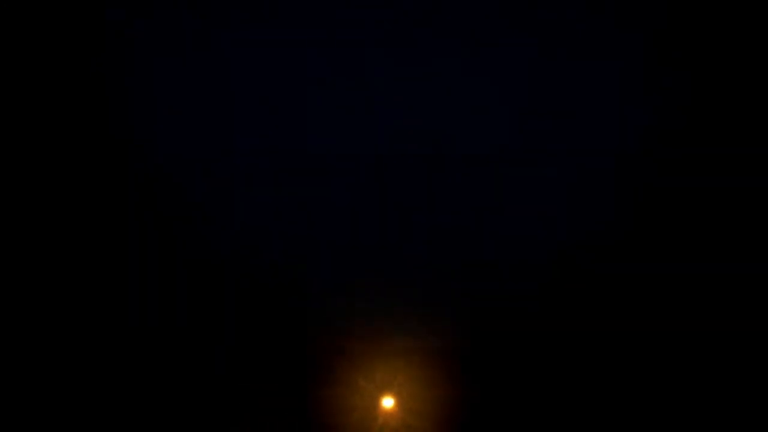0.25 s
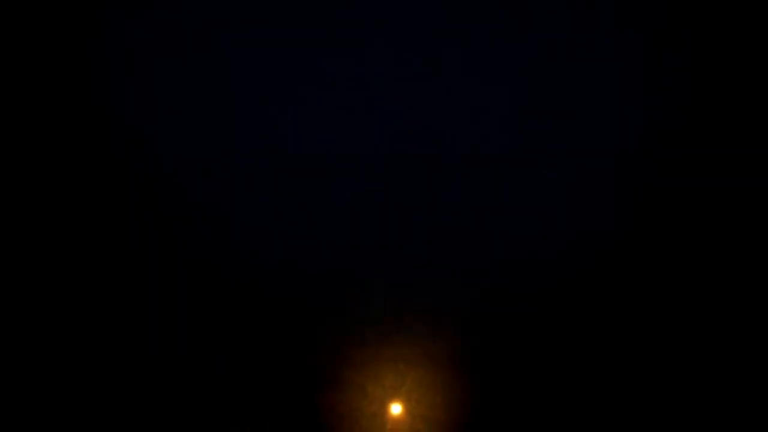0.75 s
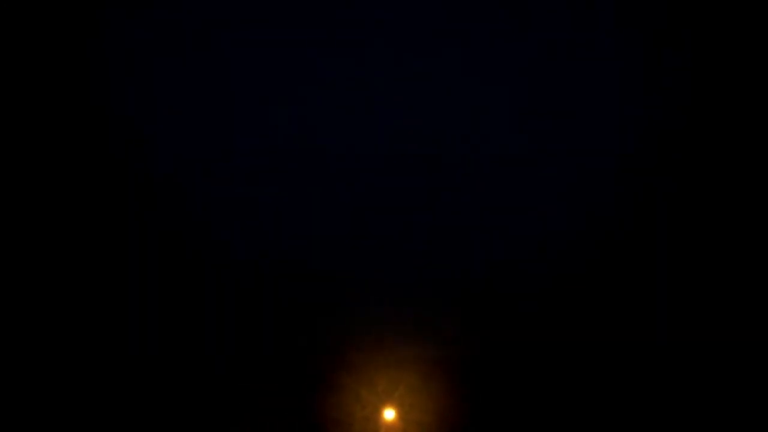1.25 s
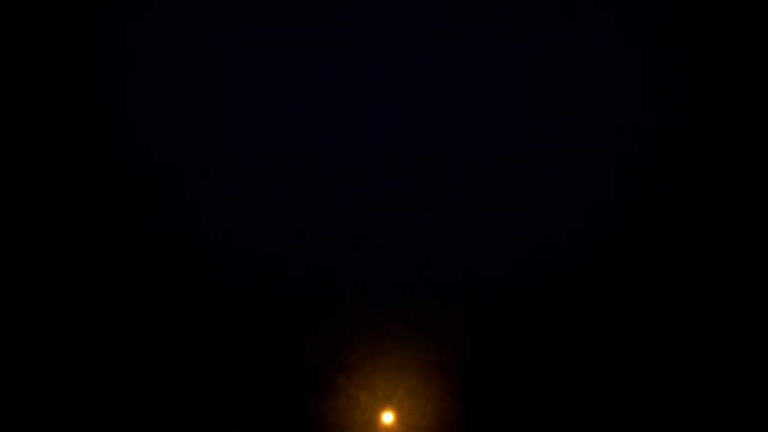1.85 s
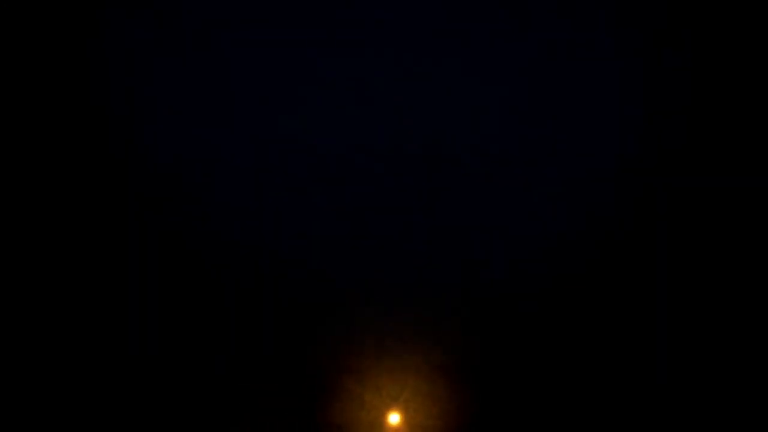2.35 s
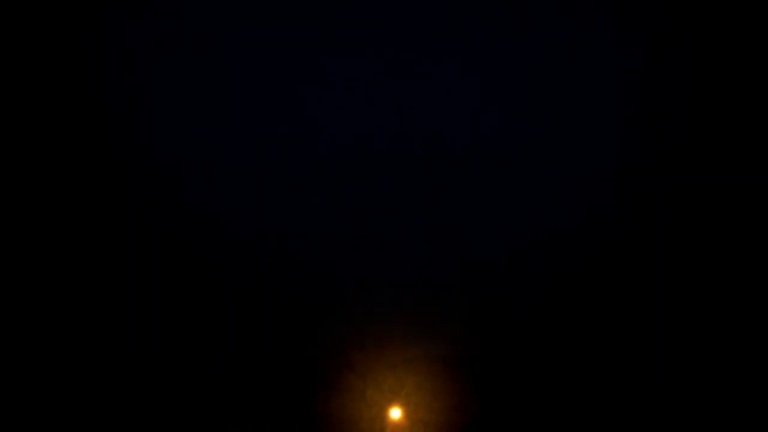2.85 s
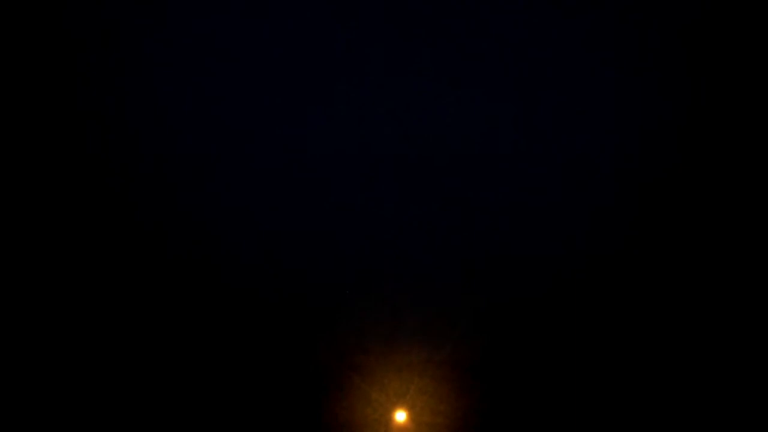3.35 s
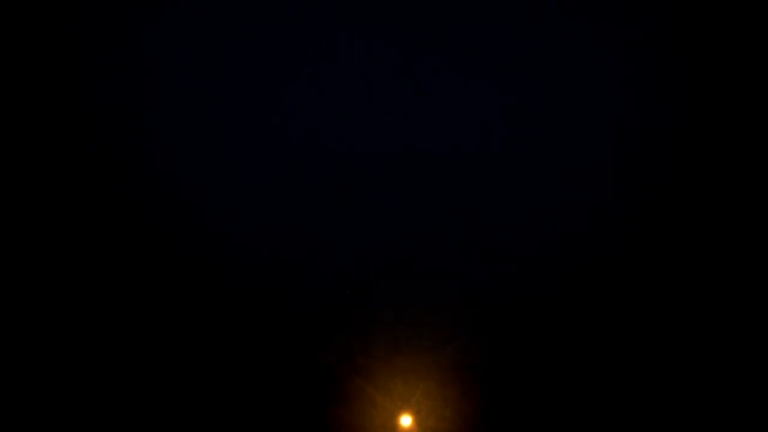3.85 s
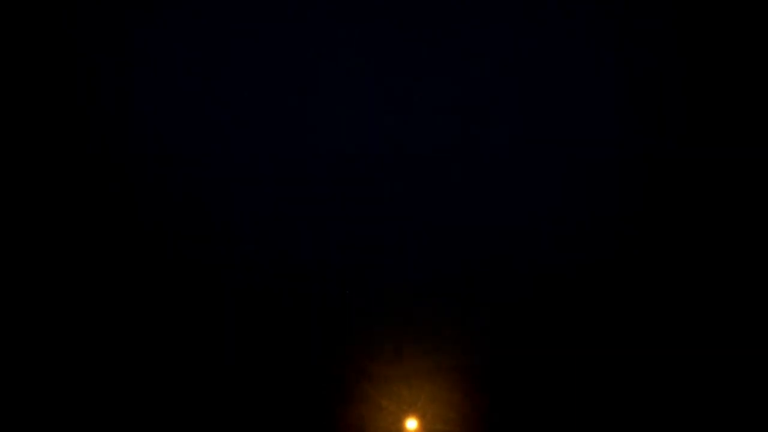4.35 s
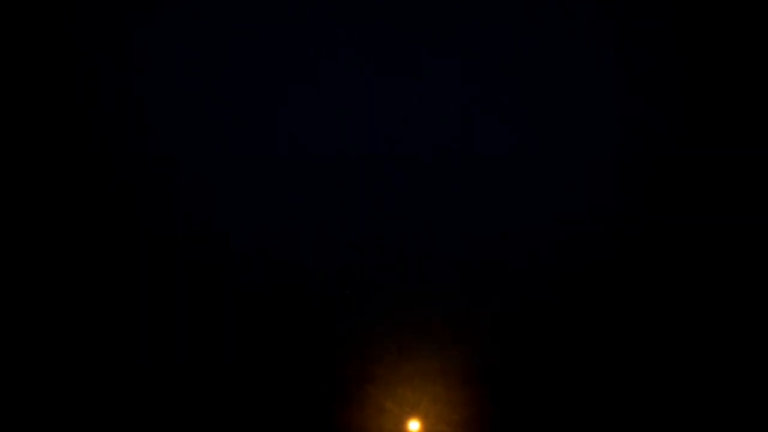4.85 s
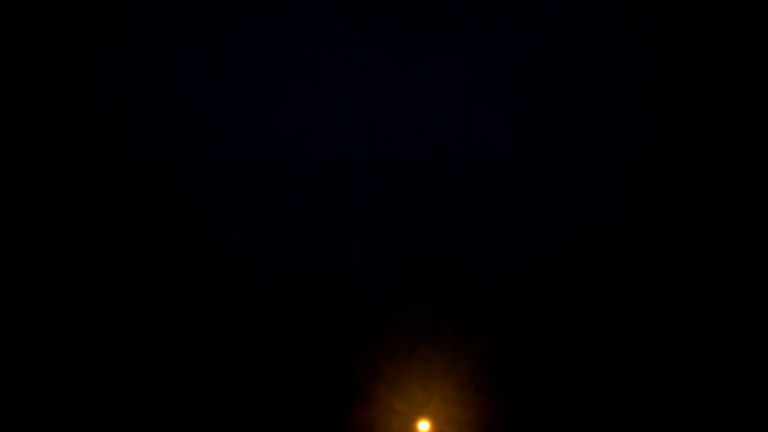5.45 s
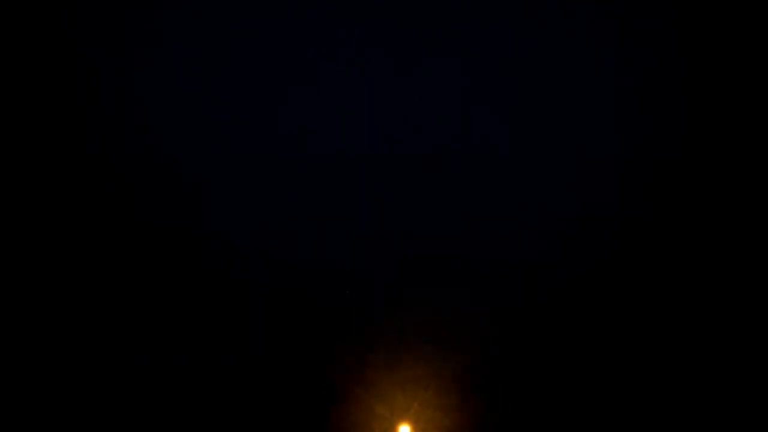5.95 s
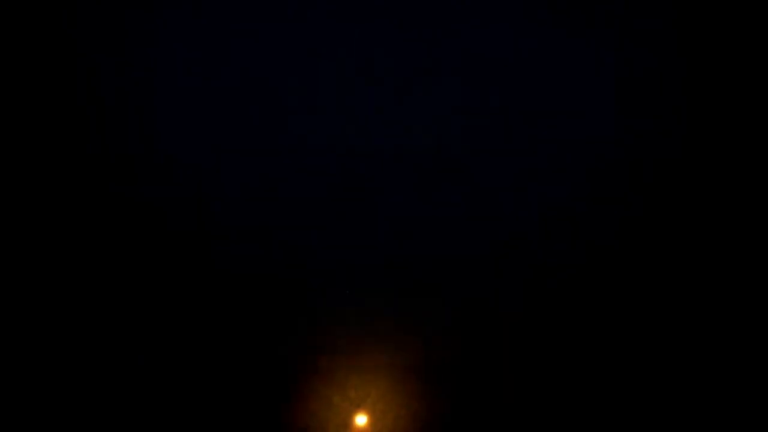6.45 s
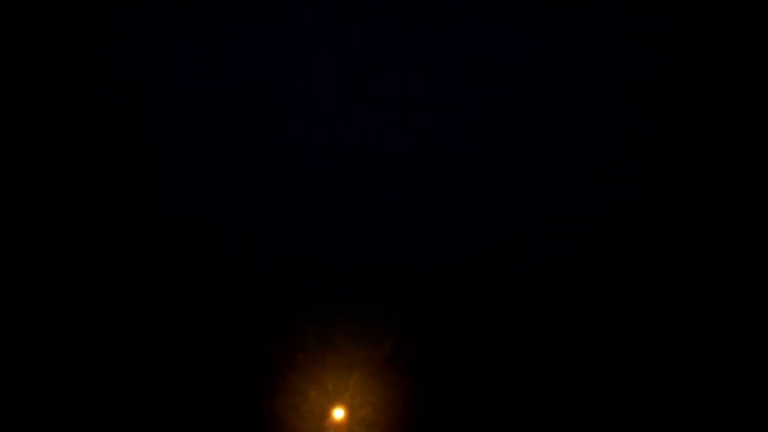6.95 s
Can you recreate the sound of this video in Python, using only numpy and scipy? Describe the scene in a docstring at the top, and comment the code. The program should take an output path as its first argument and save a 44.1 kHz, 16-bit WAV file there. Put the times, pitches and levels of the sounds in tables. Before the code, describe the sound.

Steady night rain fills the whole stretch as a dense, bright, crackling hiss with no pauses. Sharp isolated ticks of close drops land irregularly over it. The hand holding the microphone adds deep trembling rumble and soft low creaks. At about 0.9 seconds one hard knock overloads the input with a short pop, a brief hollow ring and a low thud. Sound is close, dry and essentially mono.

```python
"""Steady rain: noise for the countless far drops, random band-passed clicks for nearer ones, and
timed clicks with a short splash for the close ones. The hand that holds the device adds low tremor,
shudders and creaks, all shaped noise or swelling cosines. Lopsided pressure pulses push on the case;
the hardest overloads the input and leaves the case ringing briefly. One microphone feeds both channels."""
import sys
import numpy as np
from scipy import signal
from scipy.fft import rfft, irfft, next_fast_len
from scipy.io import wavfile

SR = 44100
rng = np.random.default_rng(int(sys.argv[2]) if len(sys.argv) > 2 else 0)


def int16_out(signal):
    """Quantize to a 16-bit WAV file."""
    q = np.round(np.clip(np.atleast_2d(signal).T, -1, 1) * 32767)
    wavfile.write(sys.argv[1], SR, q.astype(np.int16))


def volts_from_db(level):
    """Convert decibel levels to linear amplitude ratios."""
    exponent = np.asarray(level, float) / 20
    return 10 ** exponent


N = 317079

# Broad colour of the rain. Each row: frequency in Hz, relative density in dB per Hz.
RAIN_SPECTRUM = [(90, -37.5), (150, -15), (300, -18.5), (600, -21.5), (800, -17), (1300, -15), (3200, -11),
                 (5000, -10.5), (8700, -12.5), (11300, -6.5), (13500, -15), (15700, -20)]
# Strength of the rain. Each row: time in seconds, rms level in dB.
RAIN_LEVEL = [(0.0, -32.5), (0.48, -33), (2.74, -32.5), (6.85, -33), (7.19, -33.5)]
# Close drops. Each row: start in seconds, peak level in dB, centre of the click in Hz.
CLOSE_DROPS = [(0.1653, -18, 10600), (0.1708, -15, 10600), (0.248, -23, 12000), (0.8171, -23, 11100),
               (1.6444, -20, 11700), (1.6837, -14, 9900), (1.7796, -20, 11200), (2.1708, -18, 7500),
               (2.5509, -18, 7900), (2.6763, -20, 11600), (2.7246, -15, 8200), (2.7896, -17, 9400),
               (3.1452, -16, 7700), (3.3843, -20, 9200), (3.5746, -18, 7500), (4.1257, -21, 11100),
               (4.4975, -18, 7900), (4.6191, -22, 11300), (5.1505, -20, 10900), (5.1784, -20, 10000),
               (5.4519, -20, 10000), (5.5818, -20, 8900), (5.7434, -19, 8600), (6.1544, -16, 9900),
               (6.2545, -15, 9400), (6.3872, -20, 9600), (6.6088, -18, 10300), (6.6455, -18, 7000),
               (6.92, -20, 4500), (7.0698, -21, 10800), (7.1055, -19, 10700)]
# Resonances of the microphone port and housing. Each row: centre in Hz, width in Hz, gain in dB.
PORT_PEAKS = [(891, 128, 7.5), (1948, 690, 12.5), (6760, 1180, 13), (9700, 490, 5.5)]
# Colour of the hand's tremor. Each row: frequency in Hz, relative density in dB per Hz.
TREMOR_SPECTRUM = [(8, -21.5), (15, 4.5), (35, -1.5), (45, -4.5), (62, -18.5), (90, -47), (400, -100)]
# Colour of the creaking grip. Each row: frequency in Hz, relative density in dB per Hz.
CREAK_SPECTRUM = [(50, -9), (70, 5), (100, 1), (140, -10.5), (300, -26.5), (600, -31), (2000, -80)]
# How hard the hand grips. Each row: time in seconds, rms level of the tremor in dB before its waver.
GRIP_LEVEL = [(0, -31.5), (.8, -31.5), (1.5, -31.5), (2.5, -34), (4, -33), (5.5, -34), (6.3, -33),
              (6.65, -37), (7.19, -29.5)]
# Shudders of the case in the hand. Each row: middle crest in seconds, signed height (1 = full scale).
SHUDDERS = [(0.074, 0.041), (0.271, 0.06), (0.449, 0.043), (.64, 0.094), (.79, 0.074), (1.342, 0.16),
            (1.58, 0.04), (2.096, 0.11), (2.326, -.1), (2.61, 0.025), (3.058, 0.033), (3.245, 0.044),
            (3.48, 0.029), (4.21, 0.037), (4.94, 0.045), (5.481, .04), (5.57, .04), (6.075, 0.031),
            (6.224, 0.043), (6.721, 0.065), (7.15, 0.12)]
# Fingers shifting on the case. Each row: middle in seconds, top of the creak's rms swell in dB.
FINGER_CREAKS = [(.09, -52), (.166, -51), (.255, -40), (.6, -46), (1.2, -47), (1.39, -33), (1.68, -38.5),
                 (1.86, -56), (2.41, -49), (3.25, -48), (3.91, -50), (4.19, -41), (4.96, -46), (6.04, -51),
                 (7.12, -52.5)]
# Pushes on the case. Each row: top in seconds, signed height (1 = overload), rise in ms, fall in ms.
PUSHES = [(.2477, -.035, .2, .3), (.258, -.06, 3., 6.), (.8989, -3.03, .84, 1.31), (.9057, .126, .96, 9.1),
          (.9275, .32, 2.4, 15.), (1.374, .25, 4., 2.), (1.393, .04, 1.5, 1.3), (1.415, -.11, 6., 4.),
          (1.678, -.05, 5., 2.5), (4.2, .03, 3.5, 3.5), (7.185, -.05, 2., 2.)]
# Ringing modes of the case. Each row: frequency in Hz, starting level in dB, 60 dB decay in seconds.
CASE_MODES = [(576, -19, .015), (765, -14, .026), (1357, -14, .023), (1468, -17, .0085)]
# Colour of the faint noise that sets the two channels apart.
# Each row: frequency in Hz, relative density in dB per Hz.
SIDE_SPECTRUM = [(60, -28), (300, 6.5), (900, 0.5), (1500, -2.5), (10000, -8.5), (13000, 1.5), (16000, 2.5)]


def rms_one(x):
    """Scale to rms 1."""
    return x / np.sqrt(np.mean(x ** 2) + 1e-20)


def in_time(rows):
    """Level column of a (seconds, dB) table, one value per sample."""
    time_s, level_db = np.transpose(rows)
    return np.interp(np.arange(N) / SR, time_s, level_db)


def bell(middle_s, spread_ms):
    """Gaussian swell of height 1."""
    ms = (np.arange(N) / SR - middle_s) * 1000
    return np.exp(-.5 * (ms / spread_ms) ** 2)


def drift(rate_hz):
    """Slow random wander of rms 1: noise twice through a one-pole low-pass."""
    pole = np.exp(-2 * np.pi * rate_hz / SR)
    noise = rng.standard_normal(N + SR)
    slow = signal.lfilter([1], [1, -2 * pole, pole * pole], noise)
    return rms_one(slow[SR:])   # first second is run-in


def colour(x, spectrum, peaks=()):
    """Minimum-phase filter of a spectrum plus rounded peaks: clicks stay sharp, nothing sounds early."""
    size = 2 * next_fast_len(len(x) // 2 + SR // 4)
    hz, db = np.transpose(spectrum)
    grid_hz = np.maximum(np.fft.rfftfreq(size, 1 / SR), 1)
    shape_db = np.interp(np.log(grid_hz), np.log(hz), db)
    for peak_hz, width_hz, peak_db in peaks:
        shape_db += peak_db / (1 + ((grid_hz - peak_hz) / width_hz) ** 2)
    # Folding the cepstrum onto positive time gives minimum phase.
    cepstrum = irfft(np.log(volts_from_db(shape_db)), size)
    cepstrum[1:size // 2] *= 2
    cepstrum[size // 2 + 1:] = 0
    response = np.exp(rfft(cepstrum))
    return irfft(rfft(x, size) * response, size)[:len(x)]


def rain(per_s, spread_db, ticks_db, flurry_db, low_hz, high_hz):
    """Far drops sum to noise; nearer ones are uneven clicks, each dealt at random to one of four bands."""
    hiss = rng.standard_normal(N) * volts_from_db(flurry_db * drift(11.0))
    size_db = spread_db * np.minimum(rng.exponential(1, N), 3.5)
    sizes = volts_from_db(size_db) * rng.choice([-1, 1], N)
    clicks = sizes * (rng.random(N) < per_s / SR) + 1e-18   # never exactly zero
    band_of = rng.integers(0, 4, N)
    ticks = np.zeros(N)
    for k, hz in enumerate(np.geomspace(low_hz, high_hz, 4)):
        edges_hz = [hz / 1.4, min(hz * 1.4, .4 * SR)]
        band = signal.butter(1, edges_hz, "band", fs=SR, output="sos")
        ticks += signal.sosfilt(band, clicks * (band_of == k))
    mix = hiss + volts_from_db(ticks_db) * rms_one(ticks)
    return volts_from_db(in_time(RAIN_LEVEL)) * rms_one(colour(mix, RAIN_SPECTRUM, PORT_PEAKS))


def close_drops(octaves, splash_ms, splash_db):
    """Each close drop is a click in a band of its own, with a decaying splash of noise behind it."""
    size = 1024
    out = np.zeros(N + size)
    fading = np.exp(-np.arange(size) * 1000 / (splash_ms * SR))
    for start_s, peak_db, hz in CLOSE_DROPS:
        splash = volts_from_db(splash_db) * fading * rng.standard_normal(size)
        burst = splash - signal.unit_impulse(size)
        edges_hz = np.minimum(hz * 2 ** np.array([-octaves, octaves]), .4 * SR)
        band = signal.butter(2, edges_hz, "band", fs=SR, output="sos")
        burst = colour(signal.sosfilt(band, burst), RAIN_SPECTRUM, PORT_PEAKS)
        at = round(start_s * SR)
        out[at:at + size] += volts_from_db(peak_db) * burst / np.abs(burst).max()
    return out[:N]


def knock():
    """Lopsided bell-shaped pressure pushes; the case modes ring as the hardest one lets go."""
    t = np.arange(N) / SR
    out = np.zeros(N)
    for top_s, height, rise_ms, fall_ms in PUSHES:
        spread_ms = np.where(t < top_s, rise_ms, fall_ms)
        out += height * bell(top_s, spread_ms)
    since_s = np.maximum(t - .9003, 0)   # sines are zero until the release
    for hz, level_db, t60_s in CASE_MODES:
        out += volts_from_db(level_db - 60 * since_s / t60_s) * np.sin(2 * np.pi * hz * since_s)
    return out


def hand(waver_db, waver_hz, creak_under_db, shudder_hz, shudder_ms, creak_ms):
    """Muscle tremor as low noise, shudders as swelling cosines, and a creak of the grip above them."""
    grip_db = in_time(GRIP_LEVEL) + waver_db * drift(waver_hz)
    tremor_noise = colour(rng.standard_normal(N + SR), TREMOR_SPECTRUM)[SR:]
    out = volts_from_db(grip_db) * rms_one(tremor_noise)
    t = np.arange(N) / SR
    for crest_s, height in SHUDDERS:
        wobble = np.cos(2 * np.pi * shudder_hz * (t - crest_s))
        out += height * bell(crest_s, shudder_ms) * wobble
    creak_level = volts_from_db(grip_db + creak_under_db)   # steady part follows the tremor
    for middle_s, creak_db in FINGER_CREAKS:
        creak_level += volts_from_db(creak_db) * bell(middle_s, creak_ms)
    return out + creak_level * rms_one(colour(rng.standard_normal(N), CREAK_SPECTRUM))


def side_noise(level_db):
    """Faint coloured noise, opposite in sign in the two channels."""
    noise = volts_from_db(level_db) * rms_one(colour(rng.standard_normal(N), SIDE_SPECTRUM))
    return noise * [[1], [-1]]


def scene():
    """One microphone feeds both channels."""
    drops = rain(per_s=900., spread_db=3.6, ticks_db=-9.0, flurry_db=0.4, low_hz=4500., high_hz=13000.)
    close = close_drops(octaves=.7, splash_ms=2.5, splash_db=-20.)
    held = hand(waver_db=1.5, waver_hz=6.7, creak_under_db=-22.,
                shudder_hz=35.8, shudder_ms=21, creak_ms=13.5)
    return np.tile(drops + close + held + knock(), (2, 1))


def band_limit(x):
    """A steep low-pass at the top of the band."""
    return signal.sosfilt(signal.butter(12, 16680, fs=SR, output="sos"), x)


def record(dry):
    """The input clips hard, a blocking high-pass lets the flat top sag, a steep low-pass ends the treble."""
    overload, block_hz, top_hz = 1., 5., 15730
    clipped = np.clip(dry, -overload, overload)
    blocking = signal.butter(1, block_hz, "high", fs=SR, output="sos")
    pair = signal.sosfilt(blocking, clipped) + side_noise(level_db=-59)
    treble_cut = signal.ellip(14, .2, 70, top_hz, fs=SR, output="sos")
    return band_limit(signal.sosfilt(treble_cut, pair))


dry = scene()
out = record(dry)
int16_out(out)
```